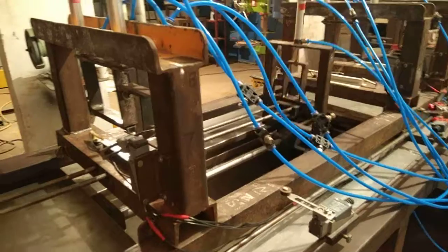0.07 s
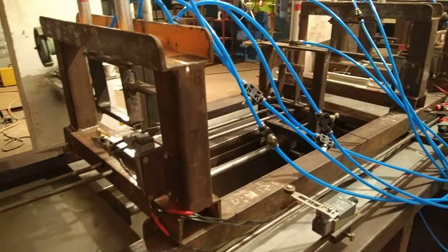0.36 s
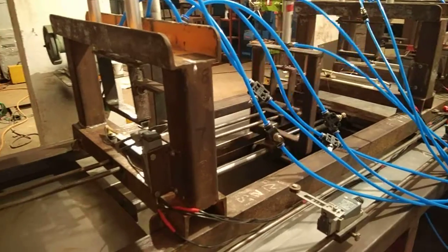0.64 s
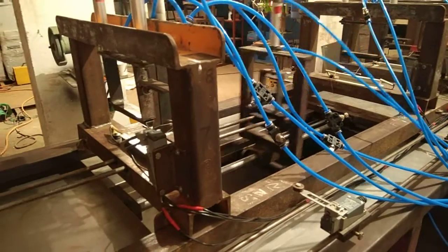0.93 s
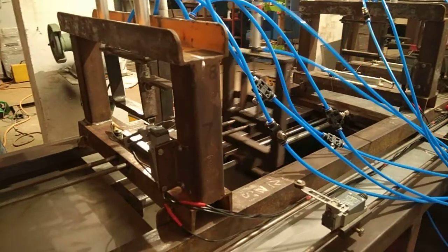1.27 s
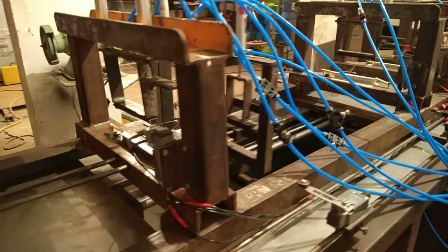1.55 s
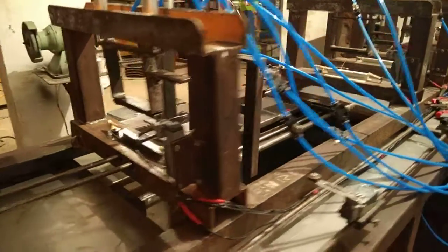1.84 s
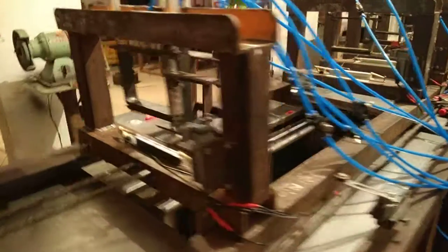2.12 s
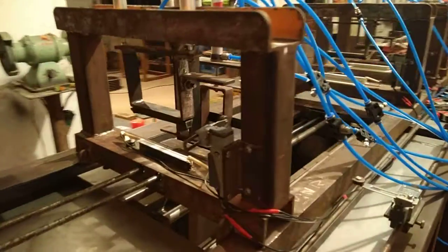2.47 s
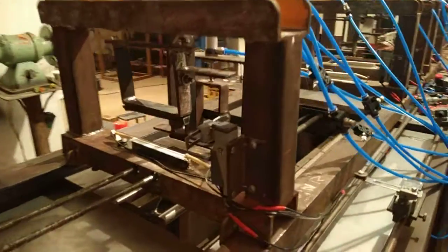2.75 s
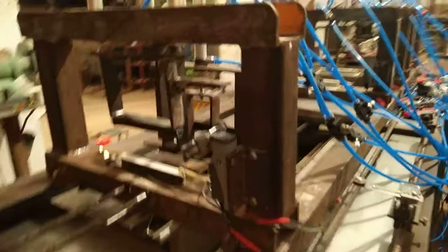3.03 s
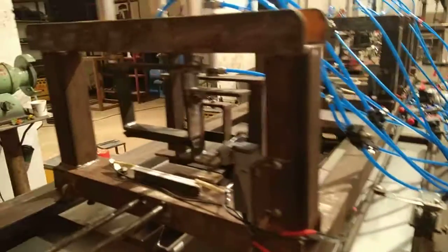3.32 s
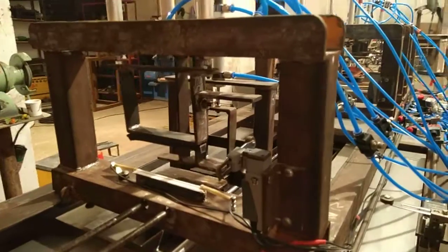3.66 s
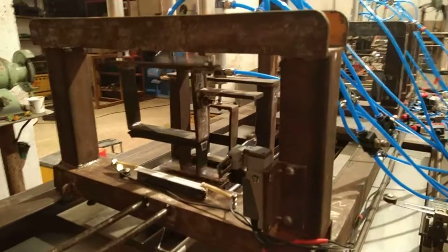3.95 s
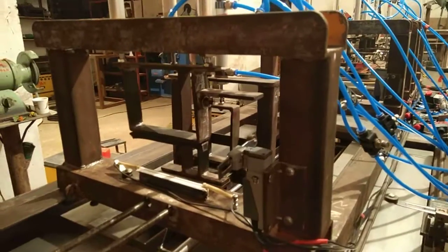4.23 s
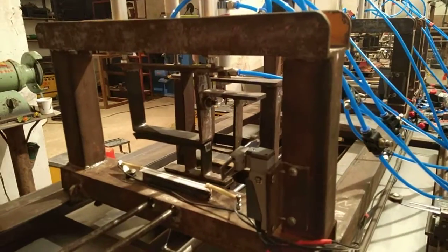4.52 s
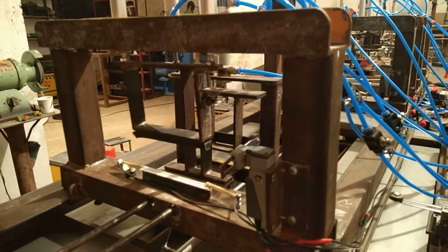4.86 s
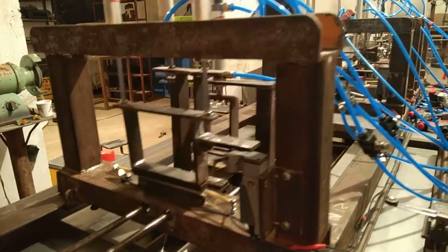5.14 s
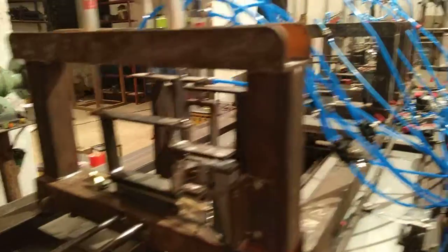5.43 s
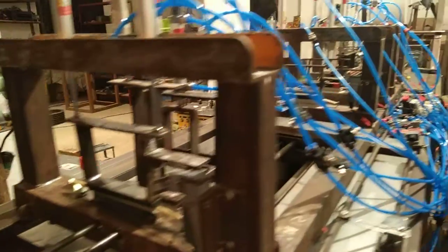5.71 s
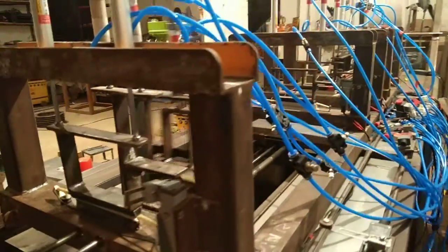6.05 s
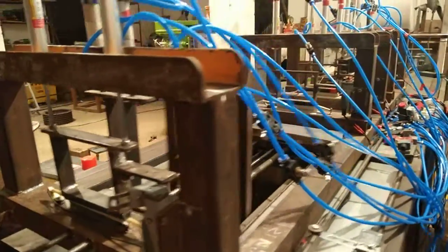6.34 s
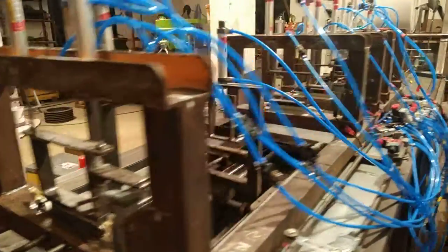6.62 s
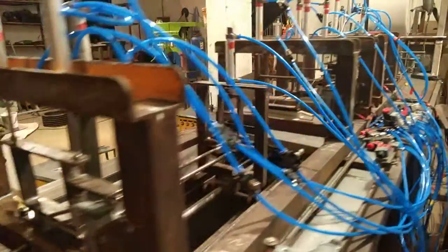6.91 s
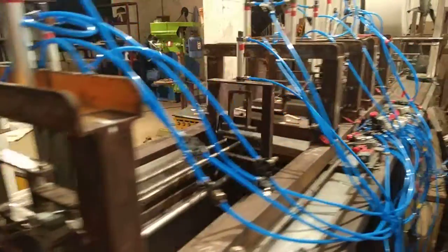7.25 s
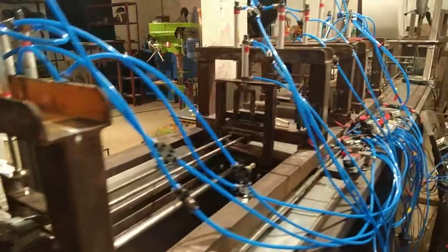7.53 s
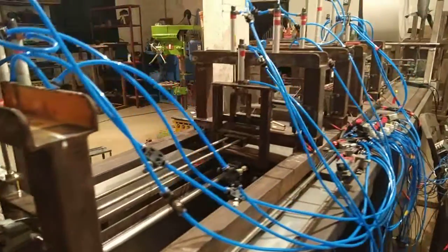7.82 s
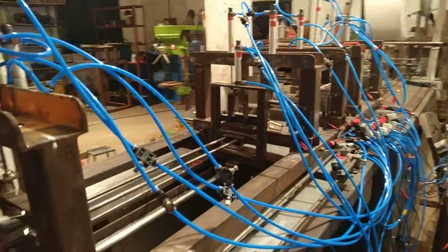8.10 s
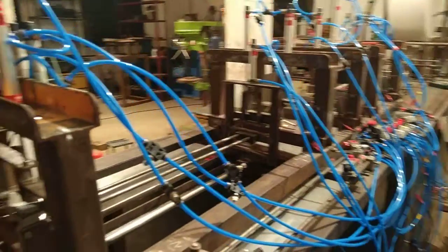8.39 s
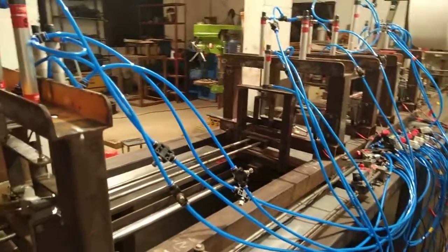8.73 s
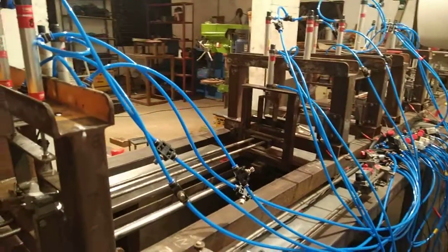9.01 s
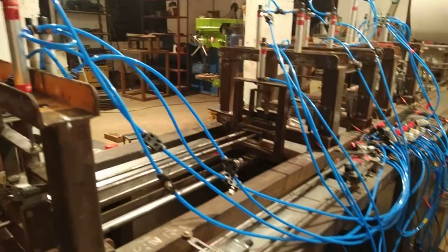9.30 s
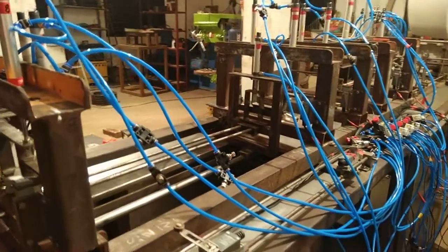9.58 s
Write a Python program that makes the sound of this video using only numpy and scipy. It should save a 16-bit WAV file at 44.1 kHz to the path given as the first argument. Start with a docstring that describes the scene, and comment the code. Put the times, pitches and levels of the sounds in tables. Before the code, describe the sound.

A low motor hum and dull room noise run throughout in a hard-walled workshop. From the start, a pneumatic carriage rolls along steel rails with a steady hiss of exhaust air and a brief squeak, knocking into its stop at 2.4 seconds. A few light clinks and scrapes follow as the microphone moves closer. At about 3.9, 4.4 and 4.9 seconds, valves click and dump air in loud, sharp puffs; steel clamps strike, rattle and ring, and the heavy frame booms. At 5.4 seconds another puff starts a stronger, bright hiss as the carriage rolls back, squeaking faintly from 6.7 seconds and scraping into its stop with a knock and a burst of air at 7.6. Only the hum and room noise remain until 9.4 seconds, when a last valve fires and the clamps clatter against the frame.

```python
"""Pneumatic cylinders work a steel welding fixture in a hard-walled workshop; a motor hums throughout.
A carriage rolls out, its throttled exhaust hissing, and hits its stop at 2.4 s. From 3.9 s, with the
microphone carried close, valves click and dump air in sharp puffs; clamps strike and the frame booms.
From 5.4 s the carriage hisses back, squeaking and scraping into its stop at 7.6 s.
At 9.4 s a last valve fires and the clamps rattle the frame again."""
import sys
import numpy as np
from scipy import signal
from scipy.fft import rfft, irfft
from scipy.io import wavfile

SR = 44100
rng = np.random.default_rng(int(sys.argv[2]) if len(sys.argv) > 2 else 0)


def generate_wav(signal):
    """Clip the signal to [-1, 1] and save it as 16-bit WAV at the path in sys.argv[1]."""
    frames = np.transpose(np.atleast_2d(signal))
    scaled = np.clip(frames, -1, 1) * 32767
    pcm = np.round(scaled).astype(np.int16)
    wavfile.write(sys.argv[1], SR, pcm)


N = 434826
T = np.arange(N) / SR

# throttled strokes: start/s, end/s, flow/dB, opening surge/dB, swell at the stop/dB, fade/s
CARRIAGE_OUT = (-.1, 2.4, -27.6, -2.3, -3, .015)
CARRIAGE_BACK = (5.434, 7.63, -22.2, 1.8, 0, .015)
# valve shifts: t/s, dump/dB, blow-down/s, tilt/(dB/oct), pilot lead/s, pilot/dB, spool clack/dB
VALVES = [(3.934, 1.5, 0.065, 5, 0.02, -13.5, -13.5), (4.426, 1, 0.029, 4, 0.0076, -16, -24),
          (4.9258, 3, 0.045, 5, 0.011, -17, -10), (5.434, -11, 0.31, 5.5, 0.019, -19, -19.5),
          (9.438, -5, 0.071, 1, 0.017, -19, -19)]


def amp(db):
    return 10 ** (np.asarray(db) / 20)


def unit(x):
    return x / np.sqrt(np.mean(x ** 2) + 1e-20)


def read(points, hz):
    """Curve value at hz, on a log-frequency axis."""
    f, value = np.transpose(points)
    return np.interp(np.log(hz + 1), np.log(f + 1), value)


def colour(x, spectrum, tilt_db_oct=0):
    """Filter by a spectrum tilted about 1 kHz."""
    hz = np.fft.rfftfreq(x.shape[-1], 1 / SR)
    octaves = np.log2(np.maximum(hz, 150) / 1000)
    return irfft(rfft(x) * amp(read(spectrum, hz) + tilt_db_oct * octaves), x.shape[-1])


def drift(rate_hz, size=N):
    """Smooth unit-RMS noise up to about rate_hz."""
    grid = np.arange(0, size + 64, 64)
    ratio = np.fft.rfftfreq(len(grid), 64 / SR) / rate_hz
    slow = irfft(rfft(rng.standard_normal(len(grid))) / (1 + ratio ** 4), len(grid))
    return unit(np.interp(np.arange(size), grid, slow))


def gate(start, end, fade_s, open_s=0.0071):
    """Opens at start, holds, decays after end."""
    return (1 - np.exp(-np.maximum(T - start, 0) / open_s)) * np.exp(-np.maximum(T - end, 0) / fade_s)


def ramp(start, end, end_db, growth_db):
    """Gain changing by growth_db to reach end_db at end."""
    return amp(end_db - growth_db * np.clip((end - T) / (end - start), 0, 1))


def add(mix, at_s, sound):
    part = mix[max(round(at_s * SR), 0):][:len(sound)]
    part += sound[:len(part)]


def pan(x, balance):
    """Constant-power pan per frequency."""
    lean = amp(read(balance, np.fft.rfftfreq(x.shape[-1], 1 / SR)))
    gains = np.array([lean, np.ones_like(lean)]) * np.sqrt(2 / (1 + lean ** 2))
    return irfft(rfft(x) * gains, x.shape[-1])


def ports(pair):
    """Two close microphone ports hear long waves alike."""
    stereo_width = [(60, -17), (200, -10.5), (400, -10), (650, -8), (1000, 0), (16000, 0)]  # f/Hz, side over mid/dB
    width = amp(read(stereo_width, np.fft.rfftfreq(pair.shape[-1], 1 / SR)))
    mid, side = rfft(pair)
    left_right = np.array([mid + width * side, mid - width * side])
    return irfft(left_right / np.hypot(1, width), pair.shape[-1])


def nearness():
    """The microphone is carried to the clamps and away."""
    path = [(1.8, 0.37), (2.7, 1), (5.3, 1), (6.2, 0.52), (8.2, 0.4)]  # t/s, nearness/(0-1)
    return np.interp(T, *np.transpose(path))


def room(x, near_db, tail_db, near_s):
    """Direct sound, quick reflections off the fixture, workshop tail."""
    reverb_times = [(100, 0.87), (500, 1.27), (2000, 0.84), (5000, 0.61), (10000, 0.48), (16000, 0.32)]  # f/Hz, T60/s
    t = T[:SR]
    direct = np.zeros((2, SR))
    direct[0, 0] = 1
    near = rng.standard_normal((2, SR)) * (rng.random((2, SR)) < 1500 / SR) * np.exp(-t / near_s)
    hz, frame_s, noise = signal.stft(rng.standard_normal((2, SR)), SR, nperseg=256)
    fade_db = -60 * frame_s / read(reverb_times, hz)[:, None]
    tail = signal.istft(noise * amp(fade_db), SR, nperseg=256)[1][:, :SR] * (1 - np.exp(-t / 0.0007))
    reflections = amp(near_db) * unit(near) + amp(tail_db) * unit(tail)
    response = unit(ports(direct + reflections / np.sqrt(SR)))
    return signal.fftconvolve(x[None], response / np.sqrt(SR), axes=1)[:, :N]


def walking_room(x, near_db, tail_db, near_s, step_s=0.3):
    """Reflections change with each step the microphone is carried."""
    out, hop = np.zeros((2, N)), round(step_s * SR)
    for start in range(0, N + hop // 2, hop):
        part = slice(max(start - hop, 0), start + hop)
        blend = np.maximum(np.cos(np.pi / 2 * (T[part] - start / SR) / step_s), 0) ** 1.3
        for side, sound in zip(out, room(x[part] * blend, near_db, tail_db, near_s)):
            add(side, T[part][0], sound)
    return out


def glance(pair, share, path_ms, port_lag_ms=0.23):
    """Air noise reaches the left port first; echoes off steel comb it, sliding as the microphone moves."""
    out = np.array([pair[0], np.interp(T - port_lag_ms / 1000, T, pair[1])])
    for side in range(2):
        for order in (1, 2):
            delay_s = order * path_ms / 1000 * np.exp(0.07 * drift(0.5))
            out[side] += share * np.interp(T - delay_s, T, pair[side])
    return out / np.sqrt(1 + 2 * share ** 2)


def rolling(stroke, end_db, growth_db, late_s=0, rise_s=0.068):
    """Rumble envelope: the carriage breaks loose and gathers speed."""
    start, end = stroke[0] + late_s, stroke[1]
    under_way = 1 - np.exp(-np.maximum(T - start, 0) / rise_s)
    return ramp(start, end, end_db, growth_db) * under_way * gate(start, end, fade_s=0.44)


def background(shop_db=-43.5, rumble_db=-47, near_boost_db=13):
    """Dull shop wash, a rumble louder by the clamps, and the rolling carriage."""
    shop_spectrum = [(25, -21), (60, -12), (95, -33), (140, -3), (220, -2), (320, -13.5), (520, -7.5),
                     (900, -11), (1300, -15.5), (2000, -18), (4000, -24.5), (5600, -28), (6900, -18),
                     (8500, -29), (15900, -25)]  # f/Hz, level/dB
    roll_spectrum = [(40, -40), (110, -6), (200, 3), (280, -0.5), (400, -3.5), (700, -6.5), (1300, -11.5),
                     (3500, -15), (7000, -21.5), (16000, -23)]  # f/Hz, level/dB
    balance = [(100, 0.5), (2500, 0.5), (4000, 1), (5500, 12), (7000, 8), (9000, 22), (16000, 32)]  # f/Hz, left over right/dB
    swell_db, judder_db = 0.25 * drift(4), 1.3 * drift(10)
    shop = amp(shop_db + swell_db) * unit(colour(rng.standard_normal((2, N)), shop_spectrum))
    envelopes = [amp(rumble_db + near_boost_db * nearness()),
                 rolling(CARRIAGE_OUT, end_db=-37, growth_db=11.5),
                 rolling(CARRIAGE_BACK, end_db=-33, growth_db=3.5, late_s=0.67)]
    level = np.linalg.norm(envelopes, axis=0) * amp(judder_db)
    roll = level * unit(colour(rng.standard_normal((2, N)), roll_spectrum))
    return pan(ports(shop + roll), balance)


def motor_hum(hz=88.74, wander=0.0045, waver_db=2, near_db=-19, rise_db_per_s=0.54):
    """Wavering motor orders; those above the second grow slowly and fade by the clamps."""
    orders = [(1, -67), (2, -40), (3, -37.5), (4, -49), (5, -59)]  # order, level/dB
    turns = np.cumsum(hz * (1 + wander * drift(4.1))) / SR
    upper_db = near_db * nearness() + rise_db_per_s * (T - T.mean())
    out = np.zeros(N)
    for order, db in orders:
        level = amp(db + waver_db * drift(9.1) + upper_db * (order > 2))
        out += level * np.sqrt(2) * np.sin(2 * np.pi * order * turns)
    return out


def rails(grit_db=3.5, wander=0.0041, fade_s=0.011):
    """Dry steel scrapes in gritty slips, or sticks and sings."""
    scrapes = [(0.148, 0.241, -32, 0.5), (2.658, 2.758, -40.5, -6), (3.212, 3.257, -35, -2),
               (7.364, 7.583, -26, 13)]  # start/s, end/s, end level/dB, growth/dB
    scrape_spectrum = [(100, -14), (500, -22), (1000, 5), (1500, 3), (2400, 6.5), (3300, 6.5), (5000, -12),
                       (16000, -33)]  # f/Hz, level/dB
    squeaks = [(0.154, 0.19, 1464, -28.5), (3.354, 3.55, 3493, -50), (6.68, 7.4, 860, -47)]  # start/s, end/s, f/Hz, level/dB
    level = sum(ramp(start, end, db, growth_db) * gate(start, end, fade_s)
                for start, end, db, growth_db in scrapes)
    grit = unit(amp(grit_db * drift(160)) * colour(rng.standard_normal(N), scrape_spectrum))
    clock_s = np.cumsum(1 + wander * drift(70)) / SR
    squeak = sum(amp(db) * gate(start, end, fade_s) * np.sin(2 * np.pi * hz * clock_s)
                 for start, end, hz, db in squeaks)
    return level * grit + squeak


def frame_thumps(rise_s=0.0076, spread_oct=0.99):
    """Moving mass shoves the heavy frame; where it lands decides which low modes answer."""
    frame_modes = [(105, -8, 0.37), (130, -4, 0.32), (150, 1, 0.32), (225.8, 1.5, 0.39), (251.9, 1.5, 0.54),
                   (289, 5.5, 0.24), (360, -2, .12)]  # f/Hz, level/dB, T60/s
    booms = [(4.2, -26.5, 130), (4.467, -16, 230), (4.532, -15.5, 240), (4.578, -18.5, 160),
             (4.654, -30, 140), (4.773, -23.5, 235), (4.929, -27, 330), (5.066, -26, 129),
             (5.131, -15, 165), (5.199, -35, 125), (7.597, -24.5, 130), (7.689, -33, 130),
             (9.488, -14.5, 255), (9.584, -21, 130), (9.65, -20.5, 280), (9.684, -29, 270)]  # t/s, level/dB, centre/Hz
    out, t = np.zeros(N), T[:SR]
    hz, mode_db, t60 = np.transpose(frame_modes)
    envelopes = amp(-60 * t / t60[:, None]) * (1 - np.exp(-t / rise_s))
    rings = np.sin(2 * np.pi * hz[:, None] * t) * envelopes
    for at_s, db, centre_hz in booms:
        shares = amp(mode_db) * np.exp(-(np.log2(hz / centre_hz) / spread_oct) ** 2)
        add(out, at_s, amp(db) * (shares / np.linalg.norm(shares)) @ rings)
    return room(out, near_db=-8, tail_db=-2.5, near_s=0.006)


def blows(hits, chatter_db, strike_db=-12.5, strike_s=0.0003):
    """One hard contact per blow, then loose parts chattering."""
    frame_spectrum = [(30, -40), (75, -46), (105, -18), (140, -8), (250, 3), (400, 1.5), (700, 2),
                      (1400, 2.5), (2800, 0), (5000, -4), (10000, -13), (16000, -30)]  # f/Hz, level/dB
    out, t = np.zeros(N), T[:SR]
    for at_s, db, tilt_db_oct, rattle_s in hits:
        chatter = rng.standard_normal(SR) * amp(chatter_db * drift(119, size=SR))
        envelope = np.exp(-t / rattle_s) + amp(strike_db) * np.exp(-t / strike_s)
        add(out, at_s, amp(db) * envelope * unit(colour(chatter, frame_spectrum, tilt_db_oct)))
    return out


def ringing(drive, modes, ring_db):
    """The drive plus the steel modes it excites."""
    t = T[:SR]
    ring = sum(amp(db - 60 * t / t60) * np.sin(2 * np.pi * hz * t) for hz, db, t60 in modes)
    return drive + amp(ring_db) * unit(signal.oaconvolve(drive, ring)[:N]) * drive.std()


def knocks(clack_s=0.011, clack_tilt_db_oct=0.5, clink_s=0.023):
    """Clamps and valve spools ring one set of modes; carriage, rails and loose parts another."""
    # steel strikes its stop and rebounds: t/s, level/dB, tilt/(dB/oct), rattle/s
    clamp_hits = [(4.023, -3.5, 1, 0.038), (4.063, -6, 5.5, 0.02), (4.137, -15, 2, 0.024),
                  (4.185, -13.5, 2.5, 0.042), (4.238, -12.5, -0.1, 0.016), (4.467, -15, -2.5, 0.026),
                  (4.497, -21.5, 0.5, 0.046), (4.551, -13.5, -2, 0.031), (4.589, -20.5, -2.5, 0.074),
                  (4.69, -30, -6.5, 0.13), (5.063, -20.5, -3, 0.06), (5.101, -19.5, -3, 0.031),
                  (5.134, -16.5, -2.5, 0.052), (5.226, -32, -6.5, 0.038), (9.474, -7, 1.5, 0.059),
                  (9.52, -15, 3, 0.035), (9.588, -10, 0, 0.034), (9.648, -11, -1.5, 0.027),
                  (9.692, -16.5, 0, 0.045)]
    carriage_hits = [(2.387, -19.5, -0.5, 0.024), (2.41, -23, -1.5, 0.075), (7.587, -19, -6, 0.018),
                     (7.626, -17, -1.5, 0.023), (7.68, -19, -5, 0.026)]
    loose_parts = [(0.098, -29, 0.5), (.158, -29, 2), (0.223, -36, 9), (2.665, -31, 4), (2.879, -19, 5.5),
                   (3.797, -36, 13)]  # t/s, level/dB, tilt/(dB/oct)
    clamp_modes = [(389.6, -17, 0.5), (556, -13, 0.53), (760, -35, .9), (900, -25, .6), (1308, -13, 0.52),
                   (1340, -7, 0.25), (1762, -7.5, 0.9), (2256, -27, 0.74), (2400, -4, 0.32),
                   (2570, -13, 0.43), (3200, -19, .6), (4527, -15, .6), (4759, -12, 0.5)]  # f/Hz, level/dB, T60/s
    carriage_modes = [(255, -33, 0.24), (390, -20, 0.74), (576, -17, .6), (830, -22, 0.45),
                      (1450, -14, 0.16), (2410, -15, 0.58), (2560, -25, 0.54), (3310, -23, .45),
                      (3731, -22, .5), (4270, -3, 1), (4975, -8, .47), (11656, 4, .25)]  # f/Hz, level/dB, T60/s
    spools = [(at_s, db, clack_tilt_db_oct, clack_s) for at_s, *_, db in VALVES]
    clinks = [(*row, clink_s) for row in loose_parts]
    clamps = ringing(blows(clamp_hits + spools, chatter_db=3), clamp_modes, ring_db=-14.5)
    carriage_drive = blows(carriage_hits + clinks, chatter_db=7.5) + rails()
    carriage = ringing(carriage_drive, carriage_modes, ring_db=-16.5)
    return walking_room(clamps + carriage, near_db=6.5, tail_db=6.5, near_s=0.0088)


def throttle(stroke, spectrum, gain_db, flutter_db, grit_db=1.6, surge_s=1, run_in_s=0.13):
    """A gritty, fluttering jet for as long as the piston travels."""
    start, end, flow_db, surge_db, swell_db, fade_s = stroke
    t = np.clip(T, start, end)
    flow_db = flow_db + surge_db * np.exp((start - t) / surge_s) + swell_db * np.exp((t - end) / run_in_s)
    flicker_db = flutter_db * drift(16) + grit_db * drift(210)
    level = amp(flow_db + gain_db + flicker_db) * gate(start, end, fade_s)
    return level * unit(colour(rng.standard_normal(N), spectrum))


def exhausts():
    """Three throttled strokes and a clamp bleeding down."""
    # strokes, columns as CARRIAGE_OUT
    clamp_lift = (4.96, 5.19, -20, 0, -.5, .055)
    clamp_bleed = (4.45, 4.92, -46, 0, 0, .02)
    # throttle spectra: f/Hz, level/dB
    out_spectrum = [(400, -36), (1000, -15.5), (2200, -9.5), (3000, -6.5), (4200, -5.5), (5000, -2),
                    (6200, -1), (8300, 3.5), (9500, -1), (11500, -1.5), (13400, -10), (15200, 1),
                    (16000, -15)]
    clamp_spectrum = [(900, -41), (2500, -11.5), (4500, -8.5), (7000, -2.5), (9500, -2.5), (13000, -9),
                      (16000, -7.5)]
    back_spectrum = [(400, -50), (1000, -16), (2200, -12), (3300, -6.5), (4200, -3.5), (5200, 3.5),
                     (6500, 3.5), (8700, 6), (10000, 5.5), (11000, 6), (13500, -1.5), (15200, 8),
                     (16000, -19)]
    balance = [(1000, -0.5), (4400, 0), (6500, 2), (8500, 5), (10000, 13.5), (12500, 15), (16000, 12)]  # f/Hz, left over right/dB
    air = throttle(CARRIAGE_OUT, out_spectrum, gain_db=4.5, flutter_db=0.5)
    air += throttle(clamp_lift, clamp_spectrum, gain_db=5.5, flutter_db=2)
    air += throttle(CARRIAGE_BACK, back_spectrum, gain_db=3.5, flutter_db=0.5)
    air += throttle(clamp_bleed, clamp_spectrum, gain_db=-4, flutter_db=2)
    heard = room(air, near_db=-8, tail_db=2, near_s=0.01)
    return pan(glance(heard, share=0.64, path_ms=2.2), balance)


def puffs(rise_s=0.0018):
    """Valves snap open and pistons seat; each jet dies as the cylinder pressure falls."""
    # air squeezed out as a piston seats: t/s, level/dB, fall/s, tilt/(dB/oct)
    escapes = [(2.403, -17, 0.026, -2.5), (4.022, 2.5, 0.036, -0.5), (4.468, -12.5, 0.091, -3.5),
               (5.06, -11, 0.04, 3.5), (7.592, -4.5, 0.054, -2.5), (7.623, -5, 0.03, 1),
               (7.672, -10, 0.0081, -5), (9.473, -7, 0.036, -3)]
    balance = [(1000, -2), (5000, -0.5), (9000, 4), (12000, 13), (16000, -2)]  # f/Hz, left over right/dB
    bursts = []
    for at_s, db, fall_s, tilt_db_oct, lead_s, pilot_db, _ in VALVES:
        pilot = (at_s - lead_s, pilot_db, 0.019, 1)  # spit before the spool moves
        crack = (at_s, 1.5, 0.015, 8.5)  # the port opens
        dump = (at_s, db, fall_s, tilt_db_oct)
        bursts += [pilot, crack, dump]
    jet_spectrum = [(100, -51), (500, -10), (1300, -4.5), (2600, -1.5), (4500, 2.5), (7000, 0.5),
                    (10500, 6), (13000, 1.5), (16000, -4)]  # f/Hz, level/dB
    out, t = np.zeros(N), T[:SR]
    for at_s, db, fall_s, tilt_db_oct in bursts + escapes:
        jet = unit(colour(rng.standard_normal(SR), jet_spectrum, tilt_db_oct))
        add(out, at_s, amp(db) * jet * (1 - np.exp(-t / rise_s)) * np.exp(-t / fall_s))
    heard = room(out, near_db=14.5, tail_db=12.5, near_s=0.0017)
    return pan(glance(heard, share=0.26, path_ms=1.6), balance)


def scene():
    return puffs() + exhausts() + knocks() + frame_thumps() + motor_hum() + background()


def record(dry, threshold_db=-14, squeeze=0.54, recover_db_per_s=70, low_hz=55, high_hz=16100):
    """Microphone bass cut, gain control ducking after the loudest puffs, clipping, band limit."""
    dry = signal.sosfilt(signal.butter(2, low_hz, "high", fs=SR, output="sos"), dry)
    power = signal.lfilter([1 / 600], [1, 1 / 600 - 1], (dry ** 2).mean(0))  # 14 ms average
    over_db = np.maximum(10 * np.log10(power + 1e-12) - threshold_db, 0)
    held_db = np.maximum.accumulate(over_db + recover_db_per_s * T) - recover_db_per_s * T
    ducked = np.clip(dry * amp(-squeeze * held_db), -1, 1)
    lowpass = signal.firwin(401, high_hz, window=("kaiser", 7), fs=SR)
    return signal.oaconvolve(ducked, lowpass[None], "same")


dry = scene()
out = record(dry)
generate_wav(out)
```